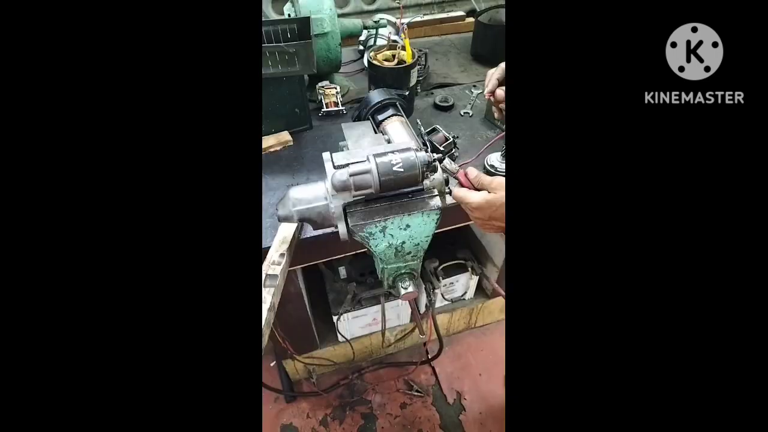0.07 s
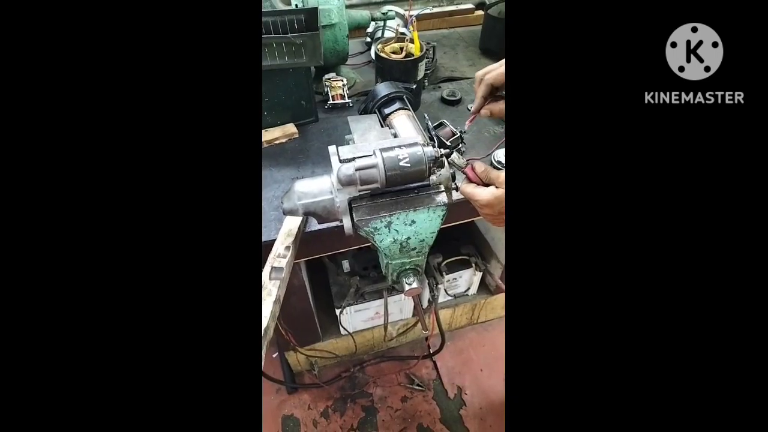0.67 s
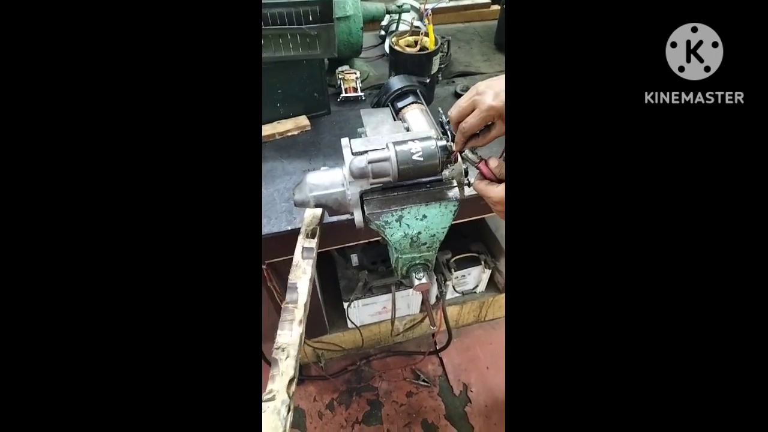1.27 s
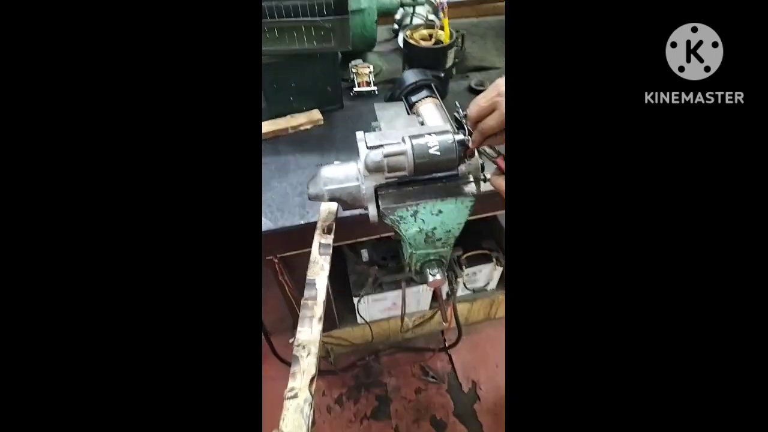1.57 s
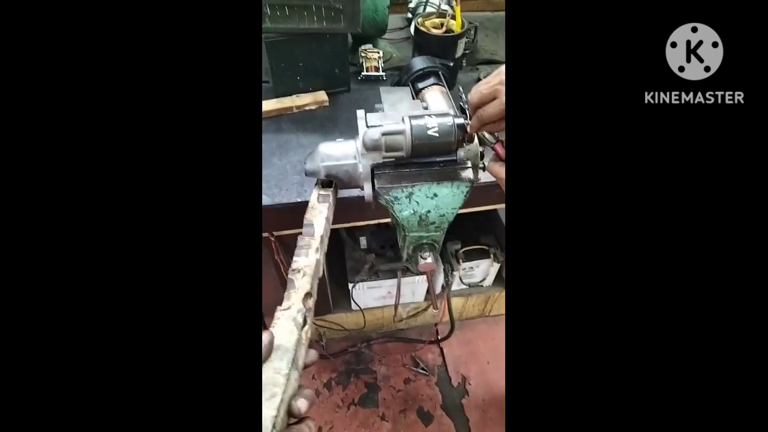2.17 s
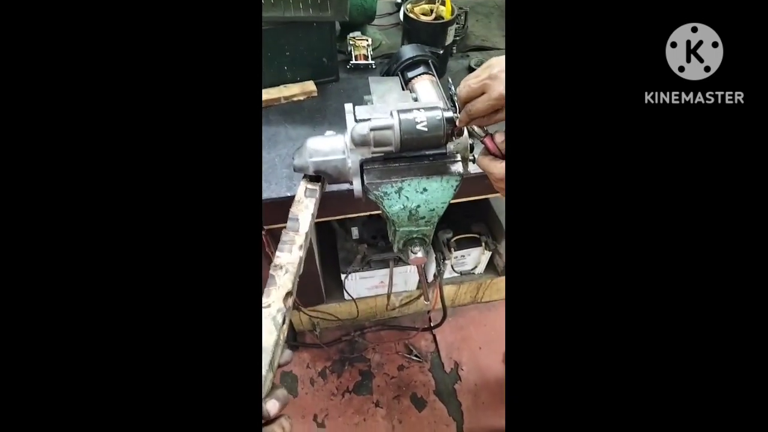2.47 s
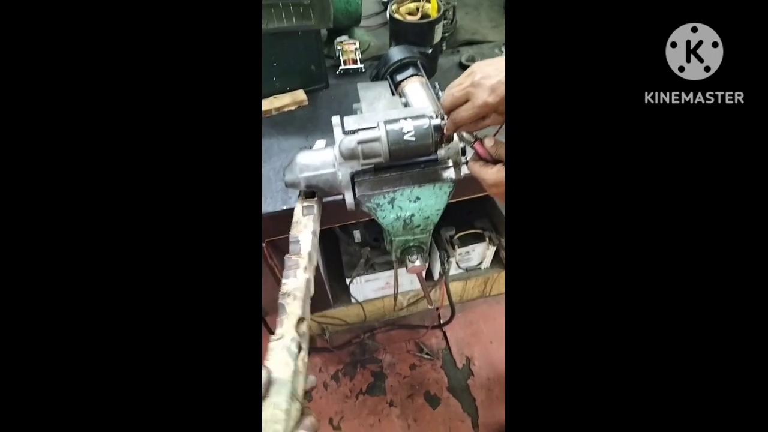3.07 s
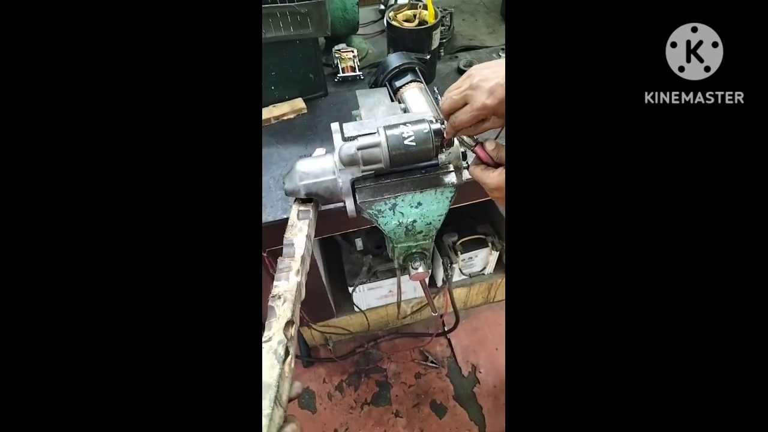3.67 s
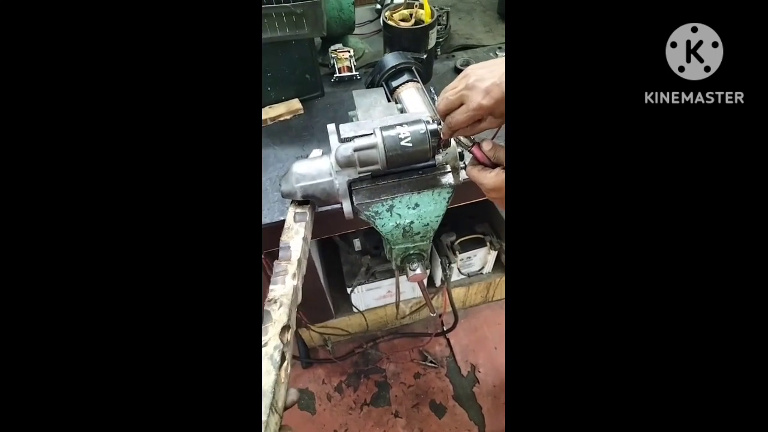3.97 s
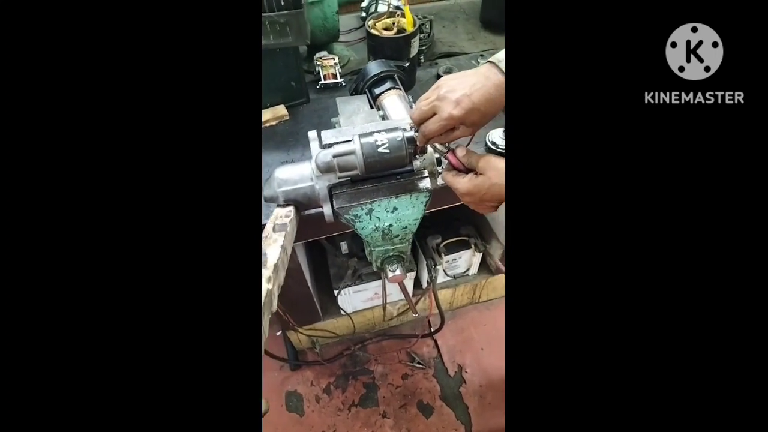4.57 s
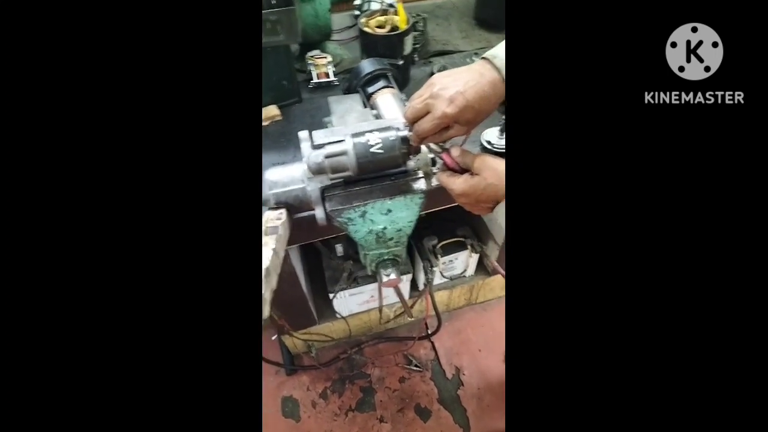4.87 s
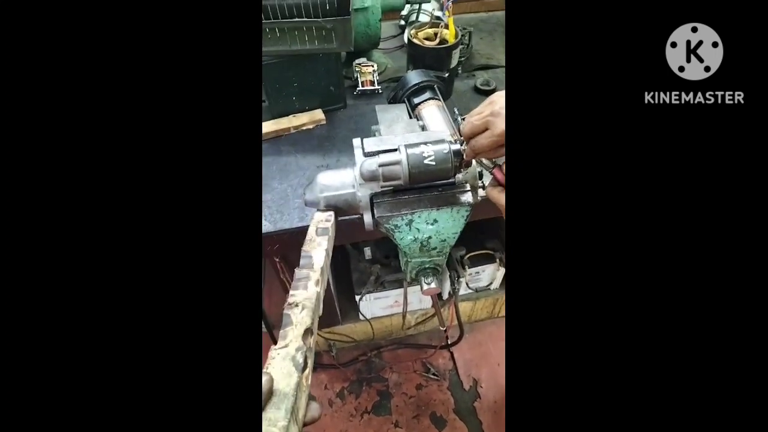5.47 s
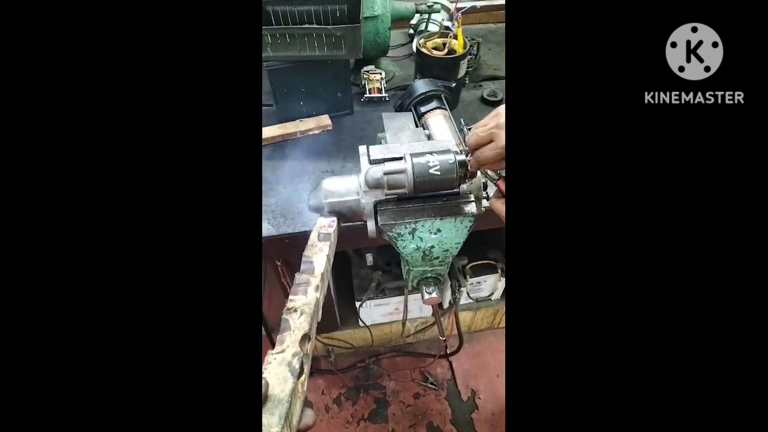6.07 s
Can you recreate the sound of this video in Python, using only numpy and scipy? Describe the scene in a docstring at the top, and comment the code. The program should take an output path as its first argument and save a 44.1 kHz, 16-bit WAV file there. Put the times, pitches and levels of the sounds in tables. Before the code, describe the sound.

In a workshop, a faint, dull whirr dies down. A lead sparks and a starter motor clamped in a vice snaps on, quickly spinning up into a loud, rattling metallic whir with scratchy hiss. It squeals briefly twice, the second time as a wooden lever meets its gear. A strong gear whine follows and sinks slightly in pitch. The sound is close and fairly dry.

```python
"""On a workshop bench, a starter motor clamped in a vice is run off a battery lead.
Over a dull whirr the lead sparks, the pinion snaps out and the motor spins up. Tooth impacts excite
the modes of bench, housing, sleeve and gears, and the brushes scratch on the commutator. The mesh
squeals briefly twice, the second time as a wooden lever meets the pinion. Under the lever's load
the teeth stay in mesh and whine at harmonics of the shaft rate while the speed sags."""
import sys
import numpy as np
from scipy import signal
from scipy.fft import rfft, irfft
from scipy.io import wavfile
from scipy.ndimage import uniform_filter1d

SR = 44100
rng = np.random.default_rng(int(sys.argv[2]) if len(sys.argv) > 2 else 0)


def bounce(signal):
    """Save signal as a 16-bit WAV file at the path given by the first command-line argument."""
    frames = np.transpose(np.atleast_2d(signal))
    limited = np.clip(frames, -1, 1)
    pcm = np.round(limited * 32767).astype(np.int16)
    wavfile.write(sys.argv[1], SR, pcm)


N = 278271
TIME = np.arange(N) / SR
START_S, SNAP_S = .5185, 1.627   # the sound begins; the pinion hits its stop
TEETH = 10

# spectrum of the workshop noise: (frequency [Hz], level [dB])
WORKSHOP_SPECTRUM = [(18, -64), (30, -30), (81, -7), (107, -14.5), (195, -0.5), (281, -7), (337, -3.5),
                     (448, -8), (645, -7), (815, -10), (1560, -13), (2030, -25), (2770, -21), (3780, -25.5),
                     (15000, -69)]
# mesh tone as the lever bears on the pinion: (time [s], attack [s], hold [s], release [s], level [dB])
LEVER_PRESSES = [(4.591, 0.0061, 0.0037, 0.081, -16), (4.685, 0.057, 1.6, .1, -18.5)]


def from_db(db):
    """Amplitude ratio of a level in decibels."""
    return 10 ** (np.asarray(db) / 20)


def rms_one(x):
    """Normalisation to unit rms."""
    return x / np.sqrt(np.mean(x ** 2) + 1e-20)


def drift(rate_hz):
    """Random modulation: noise low-passed at `rate_hz`, unit rms."""
    spectrum = rfft(rng.standard_normal(N))
    return rms_one(irfft(spectrum / (1 + (np.fft.rfftfreq(N, 1 / SR) / rate_hz) ** 2), N))


def pulse(start, attack, hold, release):
    """Trapezoidal envelope of unit height; times in seconds."""
    return np.interp(TIME, start + np.cumsum([0, attack, hold, release]), [0, 1, 1, 0])


def resonate(x, hz, width):
    """Damped resonator: two poles, unit peak gain, bandwidth in Hz."""
    r = np.exp(-np.pi * width / SR)
    poles = [1, -2 * r * np.cos(2 * np.pi * hz / SR), r * r]
    return signal.lfilter(np.array([1, 0, -1]) * (1 - r * r) / 2, poles, x + 1e-18)


def body(force, modes):
    """Modal superposition, neighbouring modes in opposite phase; unit rms."""
    return rms_one(sum((-1) ** k * from_db(db) * resonate(force, hz, width)
                       for k, (hz, width, db) in enumerate(modes)))


def sweep_through(tone, modes):
    """Forced resonance: a gliding tone swells at each steep-sided mode that it passes."""
    return sum(from_db(db) * resonate(resonate(tone, hz, width), hz, width) for hz, width, db in modes)


def colour(x, spectrum, size=8192):
    """Minimum-phase filtering: folding the cepstrum gives a causal response with this spectrum."""
    hz, db = np.transpose(spectrum)
    gain = from_db(np.interp(np.log(np.fft.rfftfreq(size, 1 / SR) + 1), np.log(hz), db))
    cepstrum = irfft(np.log(gain))
    cepstrum[1:size // 2] *= 2
    cepstrum[size // 2 + 1:] = 0
    return signal.fftconvolve(x, irfft(np.exp(rfft(cepstrum))))[:N]


def partial(turns, order, waver_db, waver_hz):
    """Shaft order: a sine of `order` cycles a turn, with random amplitude modulation."""
    tone = np.sqrt(2) * np.sin(2 * np.pi * (order * turns + rng.random()))
    return tone * from_db(waver_db * drift(waver_hz))


def workshop():
    """Resonance-coloured noise: a hollow, flickering whirr that dies down, then drops at the snap."""
    # resonances of the whirr: (frequency [Hz], bandwidth [Hz], level [dB])
    whirr_modes = [(200, 22, 9), (413, 46, 4), (1170, 87, -5), (1560, 270, -11), (2800, 94, -13),
                   (3220, 150, -16.5), (3930, 220, -16), (6030, 330, -24.5)]
    air = resonate(rng.standard_normal(N), 860, 3150)
    hollow = rms_one(sum((-1) ** k * from_db(db + 2.0 * drift(13)) * resonate(air, hz, width)
                         for k, (hz, width, db) in enumerate(whirr_modes)))
    noise = rms_one(colour(rng.standard_normal(N), WORKSHOP_SPECTRUM)) + from_db(-5.5) * hollow
    above_bass = signal.sosfilt(signal.butter(1, 190, "high", fs=SR, output="sos"), noise)
    surge_db = 3 * pulse(0.515, attack=.05, hold=0.1, release=.03)
    noise += (from_db(surge_db) - 1) * above_bass
    sink_db = 5.5 * (np.minimum(TIME, SNAP_S) - START_S)
    dip_db = 9 * np.clip((TIME - SNAP_S) / 0.04, 0, 1)
    return from_db(-33.5 - sink_db - dip_db + 0.56 * drift(30)) * noise


def room(x, t60, wet_db):
    """Reverberation: dull, diffuse reflections from bench and walls decay exponentially."""
    t = TIME[:SR // 2]
    tail = signal.lfilter([1], [1, -.5], rng.standard_normal(len(t)))
    tail *= from_db(-60 * t / t60) * (t > .004)
    return x + from_db(wet_db) * signal.fftconvolve(x, tail / np.linalg.norm(tail))[:N]


def sparks_and_knocks():
    """Transient excitation: sparks, knocks and scrapes are short bursts of band-limited noise."""
    # noise bursts: (time [s], level [dB], duration [s], frequency [Hz], bandwidth [Hz])
    bursts = [(0.526, -67, 0.14, 4400, 3900), (0.658, -34, 0.039, 210, 50), (1.03, -69, 0.016, 7900, 3000),
              (1.13, -67, 0.017, 7900, 3000), (1.606, -33, 0.011, 2860, 1500),
              (1.6136, -22.5, 0.014, 1260, 895), (1.617, -23, 0.013, 2720, 880),
              (1.627, -36, 0.0084, 4900, 5960), (1.6364, -19, 0.0024, 1500, 350),
              (3.434, -20, .028, 1050, 330), (4.21, -19, .024, 2336, 130), (4.212, -21, 0.015, 3470, 300),
              (4.599, -22.5, 0.036, 3570, 2100), (4.697, -28, 0.075, 930, 300),
              (4.717, -23, 0.062, 1460, 260), (4.719, -26.5, 0.077, 2900, 600)]
    out = np.zeros(N)
    for start, db, length, hz, width in bursts:
        noise = rng.standard_normal(N) * (TIME >= start) * (TIME < start + length)
        burst = resonate(resonate(noise, hz, width), hz, 2 * width)
        out += from_db(db) * rms_one(burst) * np.sqrt(length * SR / N)
    return out


def pinion_snap():
    """Impulse response: the pinion strikes its stop once."""
    # spectrum of the impact: (frequency [Hz], level [dB])
    snap_spectrum = [(40, -6), (250, 7.5), (700, -1), (1400, 4), (4000, -17.5), (6000, -7), (9000, -33),
                     (15000, -20)]
    snap = colour(signal.unit_impulse(N, round(SNAP_S * SR)), snap_spectrum)
    return -from_db(-1.5) * snap / np.abs(snap).max()


def load(rise_s=0.068):
    """Mechanical load: 0 while the pinion runs free, 1 once the lever bears on it."""
    return np.clip((TIME - LEVER_PRESSES[0][0]) / rise_s, 0, 1)


def lulls(swell_s=0.19, swell_db=0.6):
    """Amplitude modulation in dB: the rattle swells slightly, then dips, more in bass than treble."""
    # dips of the rattle: (time [s], onset [s], hold [s], recovery [s], bass drop [dB], treble drop [dB])
    dips = [(3.539, .04, 0.067, 0.2, 17.5, 4), (4.213, 0.039, 0.032, 0.12, 4.5, 2),
            (4.587, 0.089, .045, 0.11, 9.5, 5.5), (5.272, 0.34, .25, 0.15, 11, 1)]
    bass = treble = 0
    for start, onset, hold, recovery, bass_db, treble_db in dips:
        swell = swell_db * pulse(start - swell_s, swell_s, 0, onset)
        drop = pulse(start, onset, hold, recovery)
        bass += swell - bass_db * drop
        treble += swell - treble_db * drop
    return bass, treble


def part_db(name, speed, lull_db):
    """Power law: a part's amplitude grows with speed up to a ceiling; lulls and load shift its level."""
    # by part: (full level [dB], full speed [turns/s], exponent [1], lull weight [1], load change [dB])
    level_laws = {"thrum": (-32, 94.5, 3, 0.48, -1.5), "clatter": (-24.5, 111, 4.5, 0.5, -3),
                  "ring": (-22, 86, 4, 1.5, -2.5), "hiss": (-32.5, 109.5, 2.2, 1.4, -0.44),
                  "sleeve": (-25.5, 87, 4.5, 1, -4), "hum": (-38.0, 107.5, 11, 1.5, -21)}
    full_db, full_speed, power, lull_weight, load_db = level_laws[name]
    inrush_speed = 56   # turns/s; the starting current shakes the motor as hard as this speed does
    drive = np.minimum(np.maximum(speed, inrush_speed) / full_speed, 1)
    return full_db + power * 20 * np.log10(drive) + lull_weight * lull_db + load_db * load()


def critical_db(speed, centre, width, peak_db):
    """Critical speed: near `centre` turns/s the free-running shaft shakes a loose part harder."""
    return (1 - load()) * peak_db * np.exp(-((speed - centre) / width) ** 2)


def shaft_tones(turns, speed):
    """Rotational harmonics: wobble hums once a turn, order four drones and the commutator whistles."""
    # resonances of the drone: (frequency [Hz], bandwidth [Hz], level [dB])
    drone_modes = [(326, 26, -34.5), (447, 40, -46)]
    # resonances of the whistle: (frequency [Hz], bandwidth [Hz], level [dB])
    whistle_modes = [(4150, 560, -30), (10270, 330, -44), (10990, 100, -53)]
    bass_db, _ = lulls()
    hum_db = part_db("hum", speed, bass_db) + critical_db(speed, 106.6, width=1.4, peak_db=4)
    hum = from_db(hum_db) * partial(turns, 1, waver_db=2.0, waver_hz=48)
    drone = sweep_through(partial(turns, 4, waver_db=4.0, waver_hz=6), drone_modes)
    whistle = sweep_through(partial(turns, 96.5, waver_db=1.0, waver_hz=16), whistle_modes)
    return hum + from_db(bass_db + 6 * load()) * drone + from_db(-22 * load()) * whistle


def brush_squeaks(hz=11364, rise_s=0.034, fall_s=.055):
    """Friction noise: the brushes give thin squeaks in one narrow band."""
    # peaks of the squeaks: (time [s], level [dB])
    squeaks = [(3.23, -47), (3.334, -42), (3.43, -46), (3.542, -42), (4.146, -40), (4.338, -34),
               (4.49, -37.5), (4.59, -40)]
    band = rms_one(resonate(resonate(rng.standard_normal(N), hz, 50), hz, 120))
    return band * sum(from_db(db) * pulse(peak - rise_s, rise_s, 0, fall_s) for peak, db in squeaks)


def tooth_blows(turns, spread_db, sliding, throb_db, scatter):
    """Impact train: teeth knock unevenly across their play and rub in between; harder once a turn."""
    hits = np.flatnonzero(np.diff(np.floor(TEETH * turns + scatter * drift(400))))
    blows = np.zeros(N)
    blows[hits] = (rng.standard_normal(N) * from_db(spread_db * rng.uniform(-1.3, 1, N)))[hits]
    force = rms_one(blows) + sliding * rng.standard_normal(N)
    return force * from_db(throb_db * np.cos(2 * np.pi * turns))


def worn_pattern(turns, harmonics=56, size=1024):
    """Periodic forcing: flaws of the teeth recur every turn, giving harmonics of the shaft rate."""
    one_turn = irfft(np.r_[0, np.exp(2j * np.pi * rng.random(harmonics))], size)
    return rms_one(np.interp(turns, np.arange(size) / size, one_turn, period=1))


def brush_scratch(turns, speed, lull_db):
    """Sliding friction: brushes scratch on the commutator, harder as the load takes off speed."""
    # spectrum of the brushes: (frequency [Hz], level [dB])
    brush_spectrum = [(3530, -30), (6000, 0.5), (6500, -10), (7090, -3.5), (8020, -4.5), (9510, -21),
                      (10100, -14.5), (10800, -18), (11800, -8), (12300, -6), (12800, -16.5), (14800, -11),
                      (15500, -16)]
    scratch = tooth_blows(turns, spread_db=-2.5, sliding=2.2, throb_db=0.8, scatter=.3)
    scratch *= from_db(0.59 * drift(50))
    strain_db = 0.4666 * load() * (speed.max() - speed)
    return from_db(part_db("hiss", speed, lull_db) + strain_db) * rms_one(colour(scratch, brush_spectrum))


def rasp(force, speed, lull_db):
    """Resonant buzz: a loose part rasps near two critical speeds."""
    # modes of the loose part: (frequency [Hz], bandwidth [Hz], level [dB])
    rasp_modes = [(2340, 67, -8), (2886, 55, 7), (3064, 190, 4.5)]
    shake_db = critical_db(speed, 75, width=3.9, peak_db=15)
    shake_db += critical_db(speed, 96, width=5.2, peak_db=18)
    return from_db(-44.5 + shake_db + lull_db + 4.7 * drift(25)) * body(force, rasp_modes)


def loose_sleeve(force, speed, lull_db):
    """Sustained excitation: the blows keep the loose sleeve ringing, and it flutters."""
    # modes of the sleeve: (frequency [Hz], bandwidth [Hz], level [dB])
    sleeve_modes = [(1105, 17, -6), (1361, 16, 3)]
    ring = body(resonate(force, 1270, 480), sleeve_modes)
    ring /= np.sqrt(np.abs(uniform_filter1d(ring ** 2, size=1800))) + 1e-3   # evens out the envelope
    shake_db = critical_db(speed, 73, width=3.5, peak_db=4.1)
    shake_db += critical_db(speed, 91.2, width=2.1, peak_db=3.5)
    return from_db(part_db("sleeve", speed, lull_db) + shake_db + 3 * drift(29)) * ring


def gear_ring(force, speed, lull_db):
    """Contact loading: pressing on the pinion changes the frequency response of the gears."""
    # response of the free gears: (frequency [Hz], level [dB])
    free_spectrum = [(1060, -28), (1800, -19), (1940, -4), (2140, -12), (2350, -4), (2660, -2), (3130, 2.5),
                     (3410, -6), (3700, -1.5), (4270, -4), (4610, -9), (5130, -5.5), (5710, -7),
                     (6500, -27.5), (8450, -22), (14300, -120)]
    # response of the loaded gears: (frequency [Hz], level [dB])
    loaded_spectrum = [(1060, -52), (1800, -22), (2070, -15.5), (2330, -14), (2430, -18), (2720, -1.5),
                       (3220, -4.5), (3500, -5.5), (4320, -2.5), (4680, -13.5), (5130, -4.5), (5930, -14.5),
                       (6500, -47), (8450, -39), (14300, -120)]
    free = (1 - load()) * rms_one(colour(force, free_spectrum))
    loaded = load() * rms_one(colour(force, loaded_spectrum))
    return from_db(part_db("ring", speed, lull_db)) * (free + loaded)


def rattle(turns, speed):
    """Structure-borne sound: tooth blows shake the motor, vice and bench while the brushes scratch."""
    # response of the bench: (frequency [Hz], level [dB])
    bench_spectrum = [(29, -47), (50, -25), (156, -6), (211, -1.5), (275, -3.5), (318, -7.5), (410, -3),
                      (441, -2), (486, -7), (604, 0), (690, -3), (857, -7), (900, -1), (1170, -18.5),
                      (1980, -120)]
    # modes of the housing: (frequency [Hz], bandwidth [Hz], level [dB])
    housing_modes = [(922, 29, -6.5), (1015, 26, 5), (1135, 15.4, 7.5), (1466, 63, 7), (1664, 104, 6.5),
                     (1733, 146, 3)]
    # modes of the vice: (frequency [Hz], bandwidth [Hz], level [dB])
    vice_modes = [(121, 68, 3), (197, 52, -3), (313, 150, -4)]
    bass_db, treble_db = lulls()
    blows = tooth_blows(turns, spread_db=2.0, sliding=1.0, throb_db=0.2, scatter=.25)
    blows *= from_db(1.15 * drift(20))
    force = blows + 0.28 * worn_pattern(turns)
    bench = from_db(part_db("thrum", speed, bass_db)) * rms_one(colour(force, bench_spectrum))
    housing = from_db(part_db("clatter", speed, bass_db)) * body(force, housing_modes)
    # the wobbling shaft thumps the vice, so its level follows the law of the hum
    vice = from_db(part_db("hum", speed, bass_db) - 10) * body(resonate(blows, 150, 400), vice_modes)
    brushes = brush_scratch(turns, speed, treble_db)
    loose_parts = rasp(force, speed, treble_db) + loose_sleeve(force, speed, bass_db)
    return bench + housing + vice + brushes + loose_parts + gear_ring(force, speed, treble_db)


def squeal(turns):
    """Beating: the mesh locks for a moment, and its coherent partials add to one burst every turn."""
    # partials of the squeal: (order [cycles/turn], level [dB])
    squeal_partials = [(9, -4.5), (10, 0), (11, -15), (20, -13.5), (21, -23), (22, -16), (28, -21),
                       (29, -14), (30, -6.5), (31, -19), (40, -14), (49, -16), (50, -6.5), (51, -14)]
    age = np.clip(TIME - 3.58, -.04, .2)
    phases = rng.random(TEETH)   # sidebands share the phase of their mesh harmonic
    out = 0
    for order, db in squeal_partials:
        fade_db = 75 * age * (2 * TEETH < order <= 4 * TEETH)   # middle partials bite first, die soonest
        tone = np.sqrt(2) * np.cos(2 * np.pi * (order * turns + phases[round(order / TEETH)]))
        out += from_db(db - fade_db + 0.94 * drift(14)) * tone
    return from_db(-17) * pulse(3.531, attack=.017, hold=.05, release=.11) * out


def whine(turns):
    """Gear-mesh tone: loaded teeth sing at the tooth rate, with rougher overtones and sidebands."""
    # sidebands of the loaded gears: (order [cycles/turn], level against the mesh tone [dB])
    side_tones = [(2, -31), (6, -26), (8, -23.5), (9, -12), (11, -13.5), (12, -16.5), (13, -27), (14, -23),
                  (15, -18.5), (19, -18.5), (25, -30), (28, -19), (29, -31.5), (39, -25), (41, -19),
                  (49, -24.5)]
    # resonances that the mesh tones glide through: (frequency [Hz], bandwidth [Hz], level [dB])
    mesh_modes = [(1076, 30, -6.5), (2060, 110, -8), (2215, 100, -13), (2985, 65, -8), (3180, 170, -3.5),
                  (3338, 45, -4), (4210, 70, -9), (4430, 130, -5.5), (4960, 130, -8), (5160, 100, -9)]
    sidebands = sum(from_db(db) * partial(turns, order, waver_db=2.5, waver_hz=13)
                    for order, db in side_tones)
    mesh = partial(turns, TEETH, waver_db=0.74, waver_hz=10)
    twisted = turns + 0.0005 * drift(96)   # the gears twist a little against each other
    overtones = sum(partial(twisted, k * TEETH, waver_db=2.0, waver_hz=9.4) for k in range(2, 6))
    free_gain = from_db(-66)
    pressed_gain = sum(from_db(db) * pulse(*shape) for *shape, db in LEVER_PRESSES)
    return (free_gain + pressed_gain) * (mesh + sidebands + sweep_through(mesh + overtones, mesh_modes))


def scene():
    """Superposition: one shaft angle, the integral of the speed, times the tooth blows and tones."""
    # spin-up and sag of the pinion: (time [s], speed [turns/s])
    speed_curve = [(1.63, 12), (1.66, 33), (1.685, 42.5), (1.72, 51), (1.82, 65), (1.95, 75), (2.35, 91.8),
                   (2.7, 100.7), (3.19, 106.4), (3.65, 109.5), (4.2, 112.6), (4.68, 113.8), (4.95, 112.75),
                   (5.07, 111.8), (5.46, 107.8), (5.85, 103.3), (6.31, 97.1)]
    speed = np.interp(TIME, *np.transpose(speed_curve)) * (1 + .0008 * drift(25))
    turns = np.cumsum(speed) / SR
    running = TIME > SNAP_S
    impacts = rattle(turns, speed) * running + sparks_and_knocks() + pinion_snap()
    motor = room(impacts, t60=0.12, wet_db=-11.5)
    motor += (whine(turns) + squeal(turns) + shaft_tones(turns, speed) + brush_squeaks()) * running
    return ((motor + workshop()) * (TIME > START_S))[None]


def record(dry):
    """Soft saturation and band limiting: a trace of noise, rounded peaks and a steep top cut."""
    noise_floor = from_db(-102) * rms_one(colour(rng.standard_normal(N), WORKSHOP_SPECTRUM))
    top_cut = signal.ellip(12, .1, 90, 15400, fs=SR, output="sos")
    return signal.sosfilt(top_cut, 1.425 * np.tanh((dry + noise_floor) / 1.574))


dry = scene()
out = record(dry)
bounce(out)
```